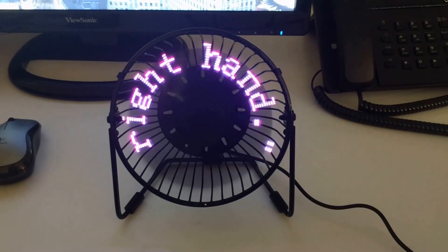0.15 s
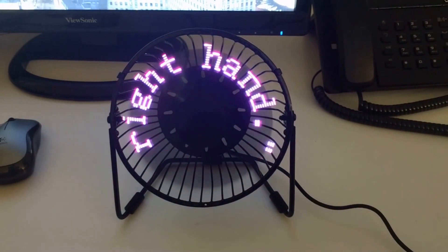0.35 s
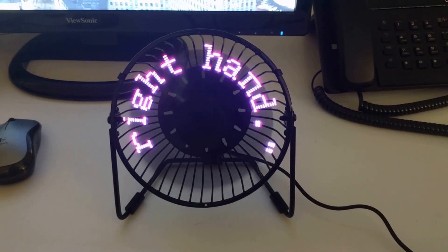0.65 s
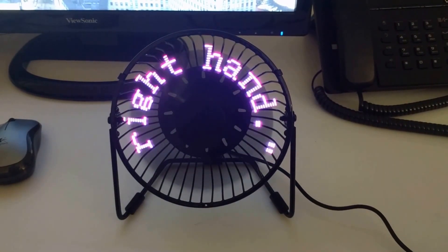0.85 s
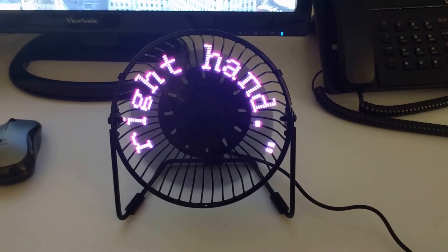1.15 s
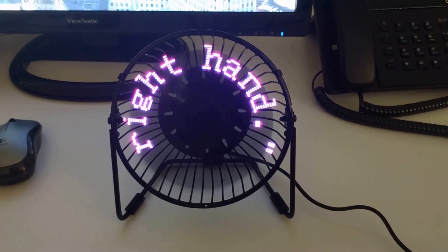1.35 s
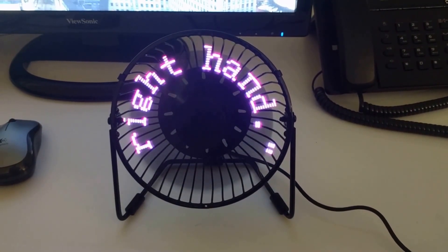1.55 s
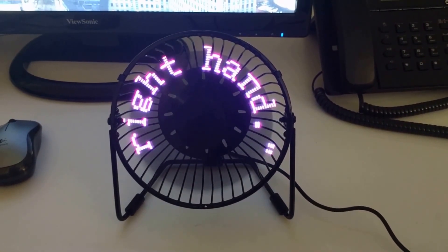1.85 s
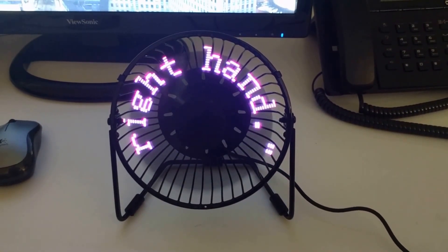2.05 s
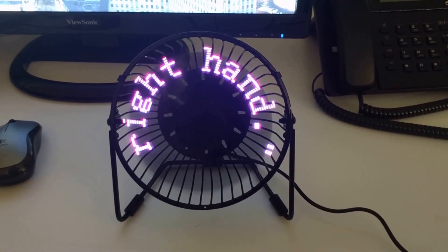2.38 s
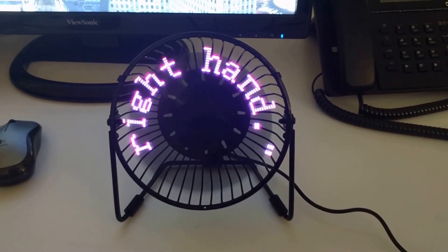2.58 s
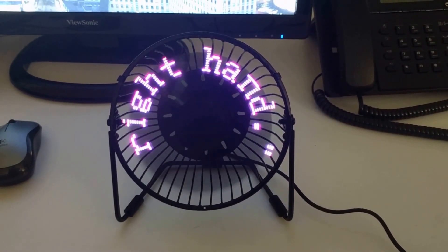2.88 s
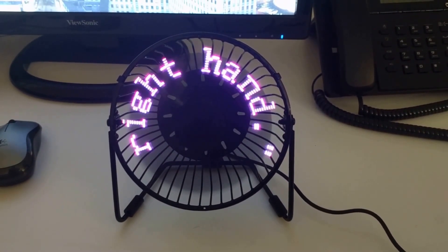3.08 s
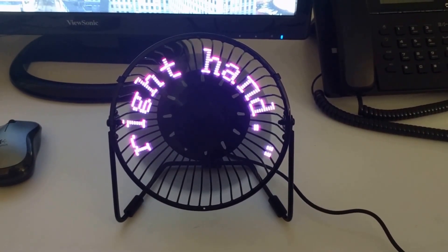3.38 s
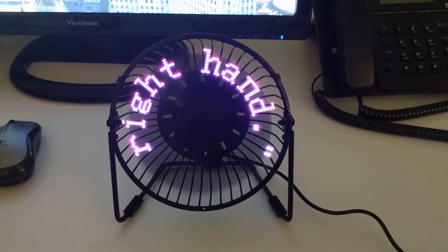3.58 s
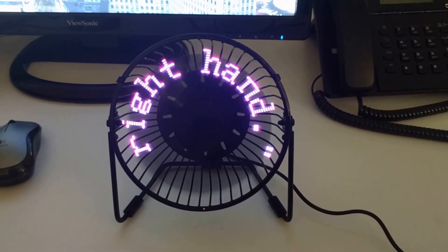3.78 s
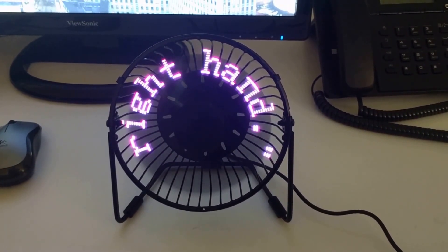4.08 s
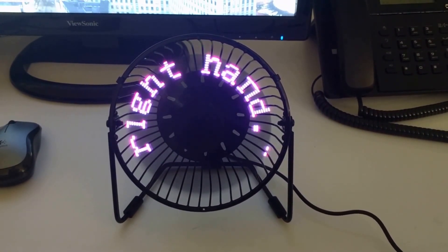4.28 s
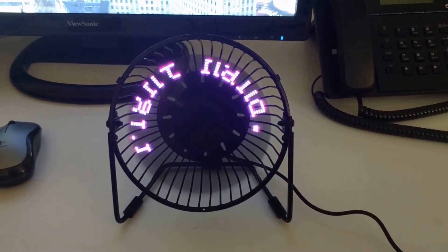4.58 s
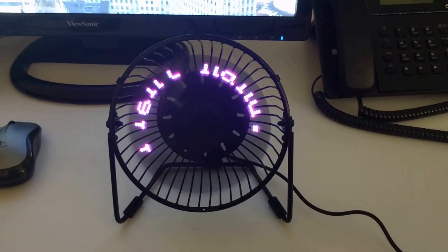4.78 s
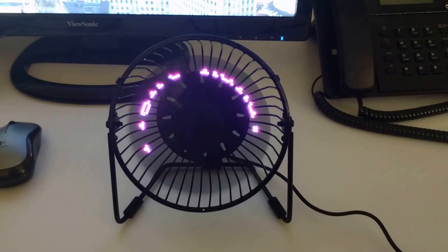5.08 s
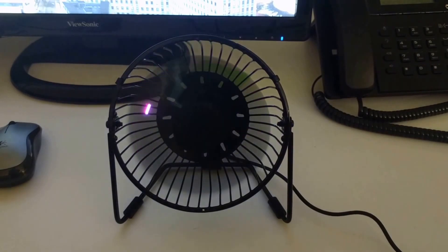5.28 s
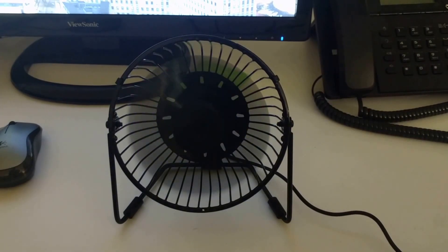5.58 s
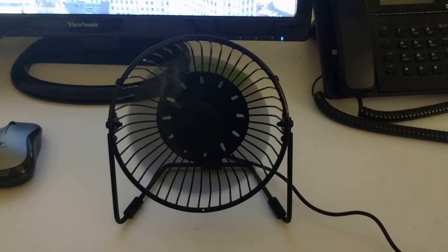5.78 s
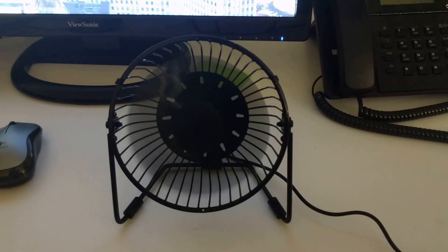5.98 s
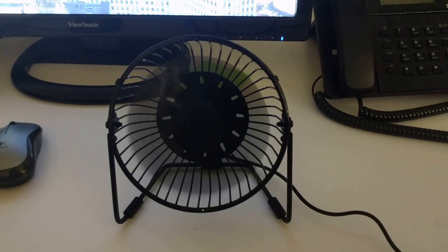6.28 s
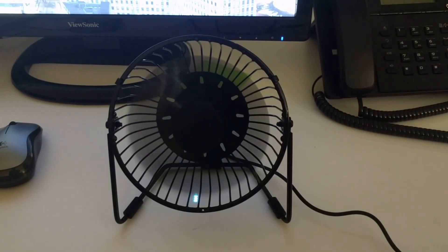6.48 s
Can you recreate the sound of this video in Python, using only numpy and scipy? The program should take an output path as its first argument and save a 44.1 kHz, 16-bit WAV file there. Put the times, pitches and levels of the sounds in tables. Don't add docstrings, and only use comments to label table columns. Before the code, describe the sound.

Low uneven wind buffeting and clustered soft pops on a microphone from a small desk fan, faint motor whine and whirr beneath.

```python
import sys
import numpy as np
from scipy import signal
from scipy.fft import rfft, irfft, next_fast_len
from scipy.io import wavfile
from scipy.ndimage import uniform_filter1d, map_coordinates

SR = 44100
rng = np.random.default_rng(int(sys.argv[2]) if len(sys.argv) > 2 else 0)


def file_out(sig):
    cols = np.atleast_2d(sig).T
    lim = np.clip(cols, -1, 1)
    pcm = np.round(lim * 32767).astype(np.int16)
    wavfile.write(sys.argv[1], SR, pcm)


def undo_db(level):
    steps = np.asarray(level, float) / 20
    return 10 ** steps


N = 292824
KNEE_DB, SQUEEZE = -32.5, 0.36


def unit(x):
    return x / np.sqrt(np.mean(x ** 2) + 1e-20)


def along(points, hz):
    f, v = np.transpose(points)
    return np.interp(np.log(hz + 1), np.log(f + 1), v)


def curves(rows):
    s, *cols = np.transpose(rows)
    return [np.interp(np.arange(N) / SR, s, c) for c in cols]


def wobble(rate_hz):
    coarse = np.arange(0, N + 64, 64)
    knots = rng.standard_normal(int(N * rate_hz / SR) + 4)
    return np.interp(np.arange(N), coarse, map_coordinates(knots, [coarse * rate_hz / SR]))


def noise(spectrum):
    m = next_fast_len(N + 8192)
    gain = undo_db(along(spectrum, np.fft.rfftfreq(m, 1 / SR)))
    return unit(irfft(rfft(rng.standard_normal(m)) * gain, m)[:N])


def unsqueezed(db):
    return db + np.maximum(db - KNEE_DB, 0) * SQUEEZE / (1 - SQUEEZE)


# start in seconds, peak in dB.
TICKS = [
    (0.4569, -50),
    (1.4611, -48),
    (2.467, -49),
    (3.4695, -50),
    (3.8142, -47),
    (4.4704, -60),
    (5.4735, -45),
    (6.4777, -49),
]


def clock():
    out, t = np.zeros(N + SR), np.arange(SR // 20) / SR
    for s, db in TICKS:
        out[round(s * SR):][:len(t)] += undo_db(db + 4.5 - 60 * t / 0.0088) * rng.standard_normal(len(t))
    band = signal.butter(2, [8500, 13500], "band", fs=SR, output="sos")
    return signal.sosfilt(band, out[:N])


# centre in seconds, half length in seconds, level in dB.
RUSTLES = [
    (0.11, 0.02, -64),
    (3.25, 0.024, -57.5),
]


def rustles():
    t = np.arange(N) / SR
    swell = sum(undo_db(db) * np.exp(-((t - s) / half_s) ** 2) for s, half_s, db in RUSTLES)
    return swell * noise([(4000, -28), (7500, 5), (16000, 5)])


# time in seconds, turns per second.
SHAFT = [(0, 40.96), (1.4, 40.94), (2.2, 40.87), (3, 40.81), (4.3, 40.84), (5.3, 40.86), (6.64, 40.8)]
# frequency in Hz, density in dB per Hz.
WHIRR = [(300, -11.5), (600, -7), (900, -4.5), (1350, -4.5), (1750, -9), (2250, -2), (2580, -4.5),
         (2950, 2), (3200, -4), (3420, -9), (3950, -9), (4150, -12.5), (8000, -21.5), (16000, -24.5)]
# frequency in Hz, level in dB.
COMB = [(900, -107), (1100, -77.5), (1500, -77.5), (1750, -78), (2200, -76), (2500, -91), (3000, -76.5),
        (3600, -115)]
STRONG = {26: 2, 27: 2, 30: 5, 32: 4, 33: 6.5, 36: 8, 39: 3, 40: 4, 42: 3, 44: 11, 45: 5.5, 51: 4, 57: 2,
          60: 5, 64: 4}


def fan():
    speed_hz, = curves(SHAFT)
    turn = 2 * np.pi * np.cumsum(speed_hz * (1 + 0.001102 * wobble(6.7))) / SR
    pulsing = 1 + .045 * np.cos(turn) + .045 * np.cos(2 * turn + 1)
    pulsing += .03 * np.cos(3 * turn + 2.5) + .035 * np.cos(4 * turn + 4)
    air = undo_db(-49.0 + 0.42 * wobble(6.9)) * pulsing * noise(WHIRR)
    lines = 0
    for order in range(24, 84):
        waver_db = 2.2 * wobble(7)
        db = along(COMB, order * speed_hz.mean()) + STRONG.get(order, 0) + 6.86 + waver_db
        lines = lines + undo_db(db) * np.sin(order * turn + 2 * np.pi * rng.random())
    return air + lines


# time in seconds, strength in dB, churn (extra flutter) in dB.
DRAUGHT = [(0, -1, 0.5), (0.3, -0.5, 4), (0.5, 1.5, 0), (0.75, -0.5, -0.5), (1.2, 0.5, -0.5), (1.5, 0, 1),
           (2.0, 0.5, -1), (2.3, 0, 0), (2.7, -2.5, -1.5), (3.2, -1, -0.5), (3.5, -2, -0.5), (3.8, -3, 6),
           (4.2, 0.5, -3.5), (4.9, -1, 1), (5.3, 1, -3), (5.7, 1.5, 3.5), (6.1, 0.5, 2), (6.64, 3, 2)]
# centre in seconds, half length in seconds, depth in dB.
LULLS = [(0.032, 0.015, 13), (0.092, 0.014, 24), (0.451, 0.026, 4.5), (0.676, 0.039, 8), (0.766, 0.018, 15),
         (0.946, 0.022, 3), (1.318, 0.053, 6.5), (1.652, 0.021, 6.5), (1.87, 0.041, 6.5),
         (2.136, 0.051, 8.5), (2.41, 0.028, 4.5), (2.959, 0.0064, 10), (3.09, 0.018, 6),
         (3.428, 0.011, 8.5), (3.541, 0.024, 7), (3.89, 0.0099, 15), (3.943, 0.05, 3), (4.092, 0.011, 6),
         (4.553, 0.013, 5.5), (4.831, 0.037, 3.5), (4.976, 0.0073, 14), (5.239, 0.0071, 5),
         (5.297, 0.062, 12), (5.476, 0.016, 17), (5.741, 0.023, 10.5), (5.884, 0.048, 3), (6.091, 0.021, 8),
         (6.302, 0.12, 1.5)]
# centre in seconds, rise in dB.
SURGES = [(0.07, 9.5), (0.2, 3.5), (0.629, 5.5), (0.87, -2), (1.058, 5.5), (1.389, 5), (1.53, 4),
          (1.601, 5), (1.699, 3.5), (1.92, 0.5), (2.16, 13), (2.341, 4), (2.718, 8.5), (2.868, 8.5),
          (2.992, 4.5), (3.279, 6), (3.642, 2.5), (3.78, 2), (4.03, 6), (4.129, 5.5), (4.199, 6.5),
          (4.268, 6), (4.579, 5), (4.661, 3), (5.068, 8.5), (5.208, 6), (5.338, 14), (5.53, 0), (5.682, 2),
          (6.219, 4)]


def stream_db(t):
    surge_half_s = 0.013
    s, db, _ = np.transpose(DRAUGHT)
    lulls = sum(depth * np.exp(-((t - at) / (0.93 * half_s)) ** 2) for at, half_s, depth in LULLS)
    surges = sum(rise * np.exp(-((t - at) / surge_half_s) ** 2) for at, rise in SURGES)
    return np.interp(t, s, db) + surges - 1.44 * lulls


# time in seconds, peak in dB, sharpness in dB.
POPS = [(0.179, -20, -9), (0.212, -20, -18), (0.338, -23.5, -14), (0.382, -18.5, -17), (0.541, -24.5, -10),
        (0.625, -25, -13), (1.15, -23, -17.5), (1.389, -19, -13.5), (1.459, -19, -15), (1.572, -20, -10),
        (1.588, -27.5, -4), (1.696, -17, -7), (2.197, -21.5, -16.5), (2.864, -18, 4.5), (3.376, -23, -12.5),
        (3.749, -18.5, -10.5), (3.836, -23.5, -16), (4.031, -20, -4), (4.23, -21, -13.5),
        (4.781, -22, -14.5), (5.503, -25, -14.5), (5.681, -20.5, -10), (5.812, -22.5, -5),
        (6.012, -18, -14), (6.048, -23, -10), (6.137, -20, -10), (6.21, -20, -13), (6.251, -21, -14),
        (6.486, -22, -12.5), (2.242, -22, -18)]
# time in seconds, peak in dB.
ROLLS = [(0.052, -22.5), (0.109, -23.5), (0.199, -23.5), (0.269, -22.5), (0.295, -24), (0.869, -24),
         (1.04, -24), (1.512, -26), (2.049, -29), (2.313, -26), (2.345, -26), (2.568, -23.5),
         (3.074, -21.5), (3.15, -26.5), (3.196, -26), (3.483, -25), (3.539, -26), (3.642, -21.5),
         (3.777, -23), (4.121, -30), (4.435, -25.5), (4.577, -38), (4.875, -26.5), (5.114, -23.5),
         (5.383, -28), (5.45, -23.5), (5.96, -24), (6.083, -24), (6.393, -25), (6.579, -25.5)]
# time in seconds, peak in dB.
FLICKS = [(0.123, -25), (0.241, -26.5), (0.401, -38), (0.74, -30), (1.271, -28), (1.442, -29), (1.484, -24),
          (1.535, -27.5), (1.748, -36), (1.927, -34), (2.026, -27), (2.277, -29), (2.662, -34),
          (3.161, -26.5), (3.28, -36.5), (3.403, -27.5), (3.812, -30), (3.911, -28.5), (4.207, -27),
          (4.314, -28), (4.335, -29), (4.662, -28), (4.73, -27), (4.855, -28.5), (5.212, -27),
          (5.334, -31.5), (5.671, -25), (5.823, -22.5), (6.177, -24.5), (6.617, -22)]


def bursts(count=100):
    roll_sharp_db, flick_sharp_db = -20.5, -15.5
    place, size, sharp = rng.random((count, 3)).T
    s = (np.arange(count) + place) / count * (N - 1) / SR
    small_db = -28 - 7.5 * size + 0.83 * np.minimum(stream_db(s), 3)
    small = [s, small_db, -24 + 8 * sharp]
    rolls = [(s, db, roll_sharp_db) for s, db in ROLLS]
    flicks = [(s, db, flick_sharp_db) for s, db in FLICKS]
    return np.vstack([POPS, rolls, flicks, np.transpose(small)])


def stirred(rows, halo_s):
    s, db, _ = rows.T
    marks = np.bincount(np.round(s * SR).astype(int), undo_db(0.1 * (db + 24.0)), N)[:N]
    t = np.arange(-1500, 1501) / SR
    return np.tanh(signal.fftconvolve(marks, np.exp(-(t / halo_s) ** 2), "same"))


def bumps(s, size, width_s):
    k = np.arange(-300, 301)
    shape = size[:, None] / np.cosh(k / SR / width_s[:, None]) ** 1.846
    at = np.clip(np.round(s * SR).astype(int)[:, None] + k, -1, N) + 1
    return np.bincount(at.ravel(), shape.ravel(), N + 2)[1:N + 1]


# frequency in Hz, density in dB per Hz.
RUMBLE = [(20, -7), (50, 8), (80, -2.5), (120, -4), (170, -12.5), (260, -25), (500, -94)]


def rumble(rows):
    heave = noise(RUMBLE)
    swell = np.abs(uniform_filter1d(uniform_filter1d(heave ** 2, size=700), size=700))
    even = heave / (swell + 0.098) ** 0.27
    return unit(even * undo_db(2.7 * stirred(rows, halo_s=0.01) + 1.15 * wobble(14)))


# frequency in Hz, density in dB per Hz.
FLUTTER = [(60, -51), (120, -10), (180, 0.5), (280, -6), (420, -12), (650, -24), (1100, -67)]


def flutter(rows, count=1100):
    s, size, width, side = rng.random((count, 4)).T
    width_s = np.clip(0.00096 + 0.00038 * width, .0007, .0015)
    patter = bumps(s * N / SR, undo_db(-12 * size) * np.sign(side - .5), width_s)
    patter = signal.sosfilt(signal.butter(2, 120, "high", fs=SR, output="sos"), patter)
    mixed = unit(patter) + undo_db(-9) * noise(FLUTTER)
    return unit(mixed * undo_db(10.8 * stirred(rows, halo_s=0.0096)))


def draught(rows):
    coarse = np.arange(0, N + 64, 64)
    strength_db = np.interp(np.arange(N), coarse, stream_db(coarse / SR))
    churn_db = curves(DRAUGHT)[1]
    rumble_db = -26 + strength_db
    flutter_db = -30 + 1.28 * strength_db + churn_db
    low = undo_db(unsqueezed(rumble_db + 2.5)) * rumble(rows)
    return low + undo_db(unsqueezed(flutter_db - 0.5)) * flutter(rows)


def eddies(rows, count=5):
    s, db, sharp_db = rows.T[:, :, None]
    chance = rng.random((len(rows), count, 4))
    follower = np.arange(count) > 0
    when = s + follower * 0.01342 * (chance[..., 0] - .4)
    lead_db = unsqueezed(db - 2) + 8.0 - 0.26 * sharp_db
    crowd_db = 4 + 9 * chance[..., 1] + 0.65 * np.maximum(sharp_db + 13, 0)
    push = np.sign(chance[:, :1, 2] - .5) * (-1) ** np.arange(count)
    size = undo_db(lead_db - follower * crowd_db) * push
    width_s = 0.00031 * undo_db(-.4 * sharp_db) * (1 + follower * (0.034 + .5 * chance[..., 3]))
    return bumps(when.ravel(), size.ravel(), np.clip(width_s.ravel(), .0001, .0014))


def scene():
    fade = np.minimum(np.arange(N)[::-1] / 500, 1) ** 2
    rows = bursts()
    wind = (draught(rows) + eddies(rows)) * fade
    return (clock() + rustles() + fan() + wind)[None]


def roll_off(x):
    return signal.sosfilt(signal.butter(12, 15960, fs=SR, output="sos"), x)


def record(dry):
    x = signal.sosfilt(signal.butter(5, 58, "high", fs=SR, output="sos"), dry)
    keep = np.exp(-1 / (0.0046 * SR))
    power = x ** 2
    for _ in range(2):
        power = signal.lfilter([1 - keep], [1, -keep], power, zi=[[.01]])[0]
    over_db = np.maximum(10 * np.log10(power + 1e-12) - KNEE_DB, 0)
    levelled = x * undo_db(-SQUEEZE * over_db)
    top = signal.ellip(8, .1, 60, 15750, fs=SR, output="sos")
    return roll_off(signal.sosfiltfilt(top, levelled))


dry = scene()
out = record(dry)
file_out(out)
```